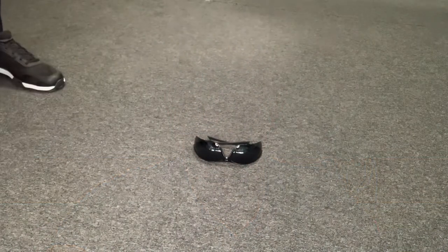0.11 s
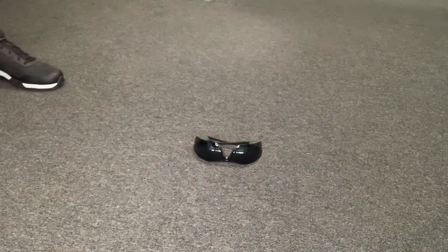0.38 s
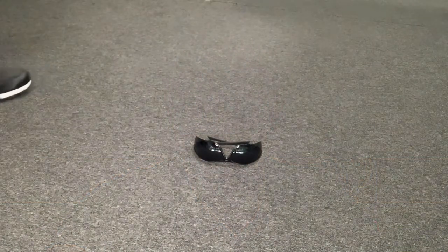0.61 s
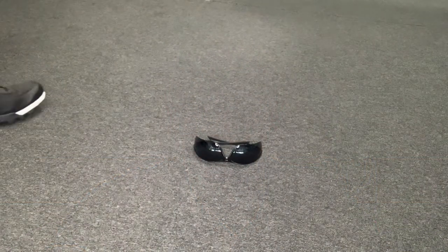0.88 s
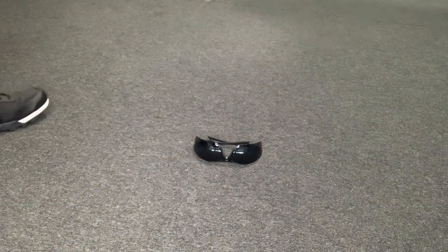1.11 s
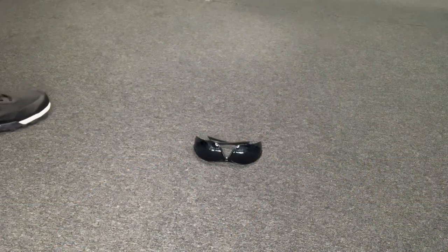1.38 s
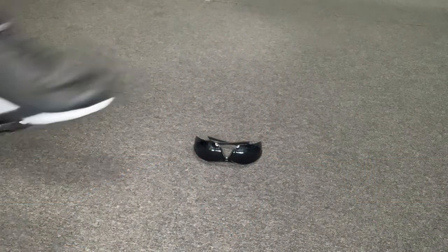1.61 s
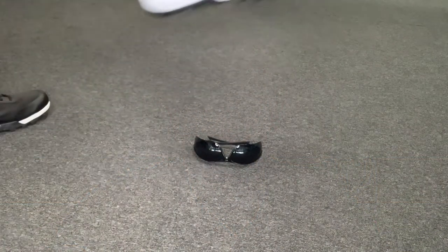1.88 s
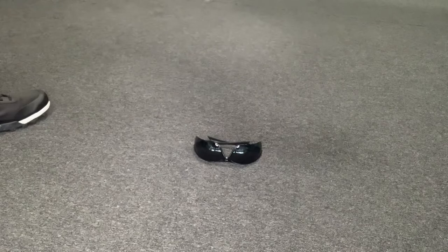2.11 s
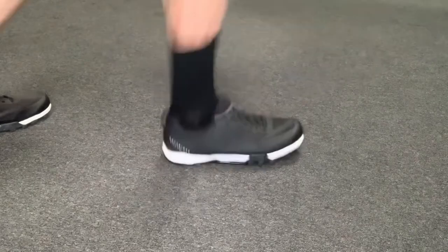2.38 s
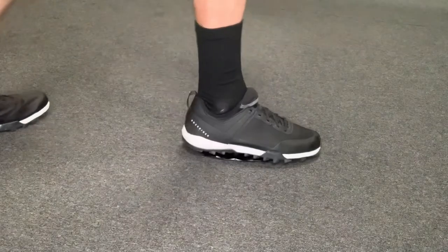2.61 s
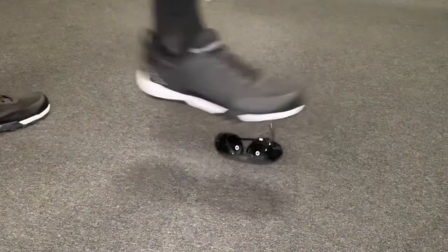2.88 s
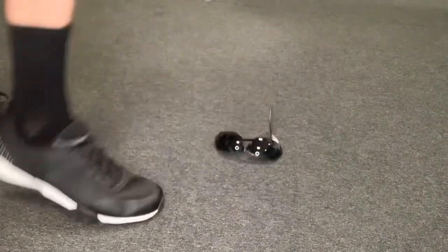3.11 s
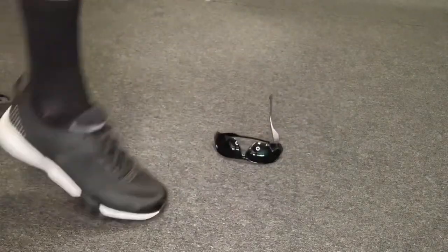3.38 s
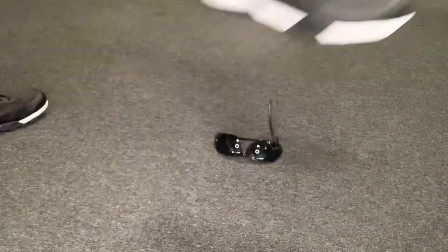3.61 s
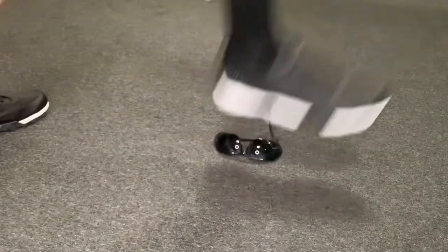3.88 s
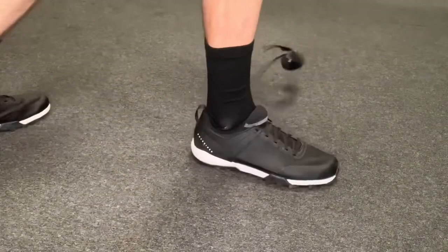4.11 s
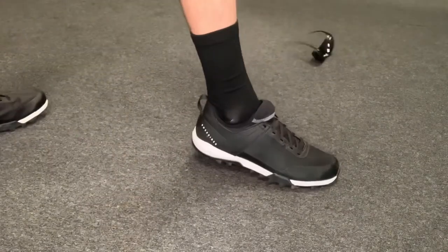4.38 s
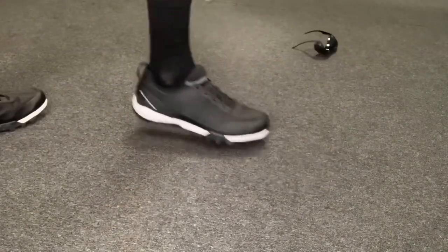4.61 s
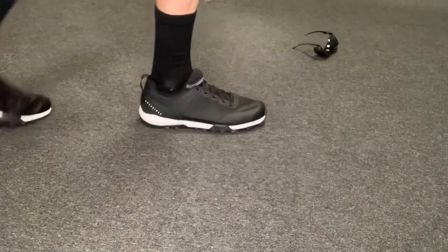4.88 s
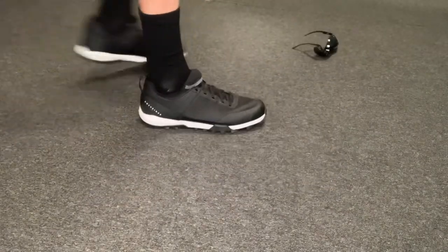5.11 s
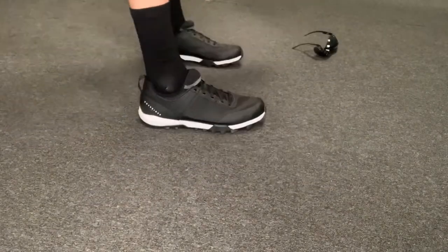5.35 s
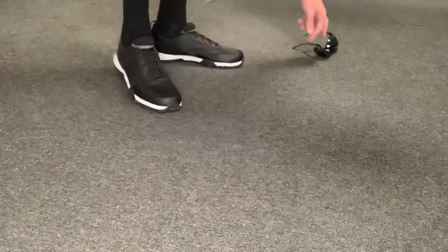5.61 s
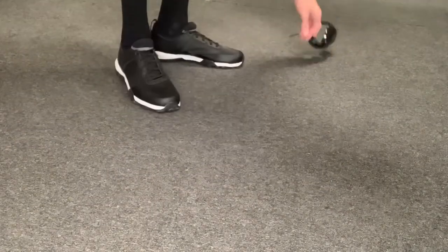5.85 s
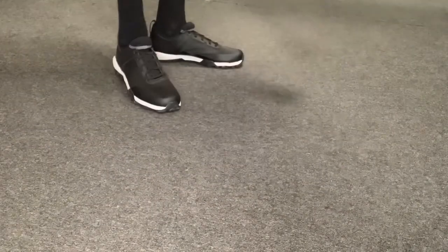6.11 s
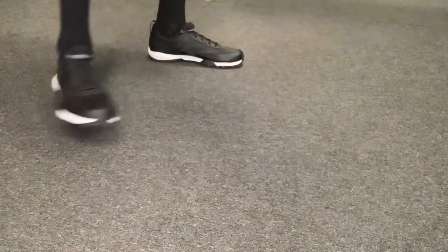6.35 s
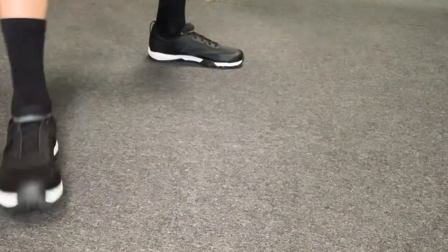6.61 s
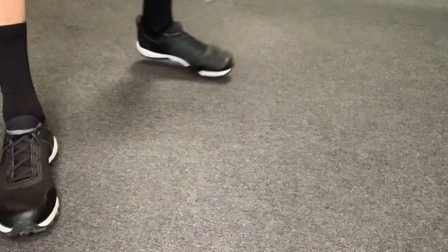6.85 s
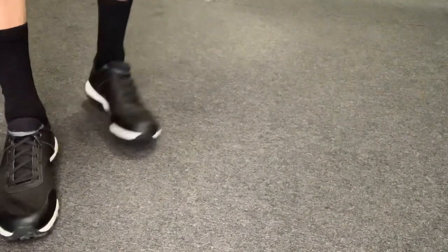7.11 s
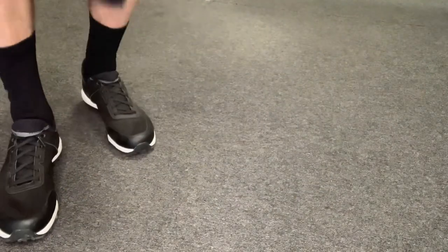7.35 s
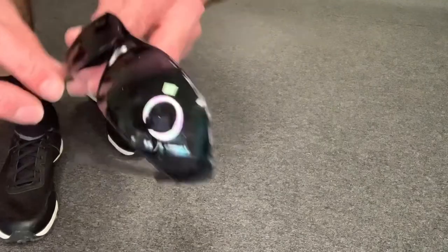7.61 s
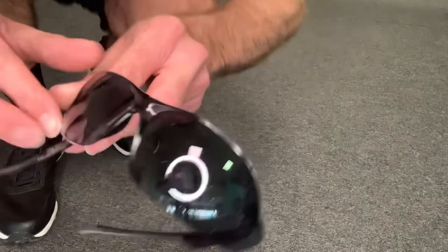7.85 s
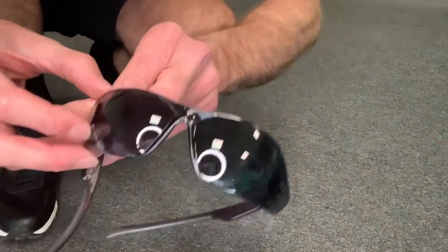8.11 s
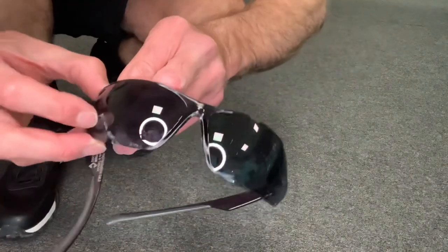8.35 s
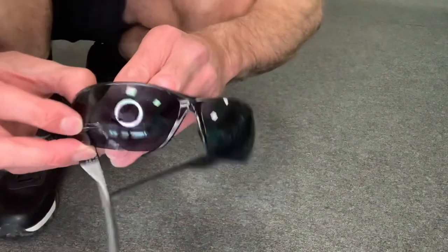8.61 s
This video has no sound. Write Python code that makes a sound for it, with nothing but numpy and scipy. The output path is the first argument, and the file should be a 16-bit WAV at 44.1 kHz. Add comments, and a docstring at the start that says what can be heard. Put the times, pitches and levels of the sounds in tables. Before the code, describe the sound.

Two violent close stamps crunch plastic glasses in a small humming room, surrounded by soft shoe shuffles, one rubber chirp and light handling clicks.

```python
"""A rubber sole stamps twice on plastic sunglasses on thin carpet, overloading a close microphone.
Noise bursts ring resonances of sole and plastic for slaps and cracks; pushes swing the floor's modes.
Around the stamps, flickering noise makes scuffs of sole and cloth, snaps make small plastic ticks, and
narrow noise makes creaks; one rubber squeak is a sagging tone. Random taps give the small room's echo,
over ventilation noise and a wavering mains hum."""
import sys
import numpy as np
from scipy import signal
from scipy.io import wavfile
from scipy.ndimage import uniform_filter1d

SR = 44100
rng = np.random.default_rng(int(sys.argv[2]) if len(sys.argv) > 2 else 0)


def dump(signal):
    """Clip the signal to [-1, 1] and save it as 16-bit WAV at the path in sys.argv[1]."""
    limited = np.clip(np.atleast_2d(signal).T, -1, 1)
    pcm = np.round(limited * 32767).astype(np.int16)
    wavfile.write(sys.argv[1], SR, pcm)


def convert_level_to_amplitude(level_db):
    """Map a level in decibels to its linear amplitude factor."""
    exponent = np.asarray(level_db, float) / 20
    return 10 ** exponent


N = 384993  # length in samples


def evened(x):
    """Scales to rms 1."""
    return x / np.sqrt(np.mean(x ** 2) + 1e-20)


def read(points, hz):
    """Reads a table along log frequency."""
    f, value = np.transpose(points)
    return np.interp(np.log(hz + 1), np.log(f + 1), value)


def add(mix, s, sound):
    """Mixes a sound in at a time in seconds."""
    part = mix[round(s * SR):][:len(sound)]
    part += sound[:len(part)]


def resonate(x, hz, width):
    """A one-pole resonance of gain 1."""
    r = np.exp(-np.pi * width / SR)
    return 2 * signal.lfilter([1 - r], [1, -r * np.exp(2j * np.pi * hz / SR)], x).real


def noise(field, size):
    """Random short-time spectra under a gain field of (seconds, Hz); a flat field of 1 gives rms 1."""
    hop = size // 4
    t = np.arange(N // hop + 5) * hop / SR
    hz = np.fft.rfftfreq(size, 1 / SR)
    a, b = rng.standard_normal((len(t), len(hz), 2)).T
    spectra = (a + 1j * b) * field(t, hz[:, None]) * np.sqrt(3 / size)
    return signal.istft(spectra, nperseg=size, noverlap=size - hop)[1][:N]


# Spectrum of the ventilation at the microphone: (frequency [Hz], relative level [dB per Hz])
AIR_SPECTRUM = [(4, -12), (12, 2.5), (30, -1.5), (45, -3), (72, -14.5), (110, -5), (170, -9.5),
                (277, -21.5), (455, -24), (600, -32.5), (1190, -39), (2500, -46.5), (12000, -62),
                (14700, -64), (16000, -78.5)]


def ventilation():
    """Steady air noise, mostly low rumble with a weak hiss above it."""
    rms_db = -46
    return convert_level_to_amplitude(rms_db) * evened(noise(lambda t, hz: convert_level_to_amplitude(read(AIR_SPECTRUM, hz)), size=4096))


# Mains hum: (frequency [Hz], width of fuzzy band [Hz], fuzzy level [dB], steady level [dB])
HUM_BANDS = [(50.7, 2.6, -53, -52.5), (102.5, 9.6, -52.5, -55.5), (152.2, 8.2, -56.5, -62),
             (198.3, 38, -61, -75.5)]


def mains_hum():
    """Steady tones inside fuzzy bands of noise, so the hum wavers."""
    out = np.zeros(N)
    t = np.arange(N) / SR
    for (hz, width, fuzzy_db, steady_db), w in zip(HUM_BANDS, rng.standard_normal((len(HUM_BANDS), N))):
        out += convert_level_to_amplitude(fuzzy_db) * evened(resonate(resonate(w, hz, width), hz, width))
        out += convert_level_to_amplitude(steady_db) * np.sqrt(2) * np.sin(2 * np.pi * hz * t + w[0])  # random phase
    return out


# Feet and trousers shuffling, before colouring: (time [s], level [dB])
SHUFFLE_LEVELS = [(0, -60), (.11, -71), (.28, -63.5), (.5, -65.5), (.63, -100), (.97, -74), (1.13, -65.5),
                  (1.45, -69.5), (1.75, -61.5), (1.97, -73.5), (2.22, -64.5), (2.6, -54), (2.7, -62.5),
                  (3.09, -67), (3.51, -59.5), (3.64, -66), (4.09, -57), (4.36, -68), (4.66, -68),
                  (4.76, -58.5), (4.95, -66.5), (5.12, -73.5), (5.39, -65), (5.55, -50), (5.75, -69),
                  (6.46, -74.5), (6.59, -61.5), (6.9, -64), (7.1, -75)]
# Hands and sleeves close to the microphone, before colouring: (time [s], level [dB])
HANDLING_LEVELS = [(6.58, -74.5), (6.73, -56.5), (7.05, -57), (7.32, -59.5), (7.96, -57.5), (8.04, -67.5),
                   (8.17, -60), (8.29, -57), (8.43, -61), (8.73, -70.5)]


def movement_db(t):
    """Levels of feet and of hands at the times t; silent outside their tables."""
    return [np.interp(t, *np.transpose(rows), -120, -120) for rows in (SHUFFLE_LEVELS, HANDLING_LEVELS)]


# Single rubbing strokes, before colouring:
# (start time [s], end time [s], level [dB], centre [Hz], slope above it [dB per octave])
RUB_STROKES = [(0.11, 0.158, -44, 2800, -5), (0.147, 0.202, -47, 2000, -5.5), (0.21, 0.46, -55, 2500, -6.5),
               (0.922, 1.015, -51.5, 1800, -9), (1.3, 1.366, -61.5, 3500, -5),
               (1.344, 1.384, -50, 1500, -4), (2.618, 2.719, -52, 3480, -6.5),
               (3.028, 3.135, -53, 2200, -5), (3.345, 3.367, -50.5, 2900, -7),
               (4.117, 4.15, -50.5, 3000, -9), (4.184, 4.26, -51.5, 3300, -15),
               (4.792, 4.883, -50, 1400, -7.5), (4.875, 4.92, -51.5, 1500, -5),
               (5.368, 5.438, -43.5, 1700, -10), (5.433, 5.48, -51.5, 2500, -5.5),
               (5.478, 5.59, -32, 2780, -16), (6.117, 6.197, -54.5, 2500, -7.5),
               (6.531, 6.616, -50, 1000, -1.5), (6.827, 6.924, -34, 910, -10.5),
               (6.97, 7.11, -44.5, 1014, -11), (7.178, 7.278, -46, 2000, -1.5), (7.68, 7.756, -53, 2980, 0),
               (8.155, 8.241, -37, 1500, -2)]
# Colour shared by all scuffing: (frequency [Hz], gain [dB])
SCUFF_GAINS = [(150, -57.5), (400, -0.5), (900, 2), (3000, 2.5), (8000, -1.5), (12000, -3), (15000, -14),
               (16000, -13.5)]


def scuffs():
    """Fibres catch and let go: flickering noise, brighter or duller with the stroke."""
    soft_db, soft_tilt_db, dulling = -74.5, -1.5, -0.24  # tilt per octave when soft, its change per dB
    handling_tilt_db = -3  # per octave
    stroke_lean = .75  # under 1: a stroke swells faster than it fades

    def field(t, hz):
        octaves = np.log2(np.maximum(hz, 800) / 3000)
        feet_db, hands_db = movement_db(t)
        tilt = soft_tilt_db + dulling * np.maximum(feet_db - soft_db, 0)  # harder shuffling is duller
        power = convert_level_to_amplitude(feet_db + tilt * octaves) ** 2
        power = power + convert_level_to_amplitude(hands_db + handling_tilt_db * octaves) ** 2
        for start, end, db, centre_hz, slope in RUB_STROKES:
            on = (t > start) & (t < end)
            off = np.log2((hz + 1) / centre_hz)
            shape_db = np.where(off > 0, slope * off, 0.64 * off)
            progress = (t[on] - start) / (end - start)
            swell = np.sin(np.pi * progress ** stroke_lean)
            power[:, on] += convert_level_to_amplitude(db + shape_db) ** 2 * swell ** 2
        # single fibres snap across all bands
        flicker_db = 0.9 * np.minimum(rng.exponential(1, len(t)), 6)
        patches = rng.standard_normal((len(t), len(hz))).T
        for axis in (0, 1):
            patches = uniform_filter1d(patches, size=8, axis=axis)
        flicker = evened(convert_level_to_amplitude(flicker_db + 2.7 * evened(patches)))
        return np.sqrt(power) * convert_level_to_amplitude(read(SCUFF_GAINS, hz)) * flicker
    return noise(field, size=256)


# Weight coming on the floor: (time [s], level [dB], contact [s])
FOOT_LANDINGS = [(.15, -38, .0088), (1.363, -27.5, 0.032), (1.43, -21.5, 0.078), (2.345, -14, 0.0096),
                 (3.04, -25, 0.0087), (3.9, -12, .008), (6.538, -27, .0026), (6.565, -16.5, 0.032),
                 (6.685, -23.5, 0.023), (8.23, -27, 0.028)]
# Weight lifting off the floor: (time [s], level [dB], contact [s])
FOOT_LIFTS = [(.12, -34.5, 0.0032), (3.13, -22.5, 0.043), (3.3, -24, .05), (8.17, -13, 0.09)]
# Low modes of the floor: (frequency [Hz], relative level [dB], decay by 60 dB [s])
FLOOR_RESONANCES = [(14.037, -2, 0.78), (20, 0, 0.51), (32.7, -4.5, 0.98), (45, -6, 0.38), (62, -4.5, .43),
                    (130, -13.5, .6), (182, -16.5, 0.53)]


def footfalls():
    """A half-sine push, softer for longer contact, sets the floor's low modes swinging."""
    force, t = np.zeros(N), np.arange(SR // 2) / SR
    for rows, direction in ((FOOT_LANDINGS, 1), (FOOT_LIFTS, -1)):
        for s, db, contact in rows:
            push = np.sin(np.pi * np.arange(0, contact, 1 / SR) / contact)
            add(force, s, direction * convert_level_to_amplitude(db) * push / np.sqrt(contact * SR * push.sum()))
    floor = sum(convert_level_to_amplitude(db - 60 * t / t60) * np.cos(2 * np.pi * hz * t) for hz, db, t60 in FLOOR_RESONANCES)
    return signal.oaconvolve(force, floor)[:N]


# The sole slaps the floor; the whole sole sounds deep, heel or toe alone higher:
# (time [s], length [s], level [dB], lowest resonance [Hz])
SOLE_SLAPS = [(0.1207, 0.011, -46, 680), (0.151, 0.0025, -42.5, 910), (1.1552, 0.0033, -41, 590),
              (1.365, .008, -54, 895), (2.338, .007, -6, 427), (3.039, .004, -34, 600),
              (3.897, 0.0031, -15.5, 780), (3.9027, 0.0024, -4.5, 370.5), (3.9358, 0.0019, -15, 487),
              (4.199, 0.0046, -39, 526), (6.551, 0.0088, -50, 597)]
# Broad resonances of the sole: (pitch [x lowest], width [x lowest], gain [dB])
SOLE_RESONANCES = [(1, 0.76, 1.2), (2.2, 1.3, -8)]


def sole_slaps():
    """Lists each slap through each resonance: (time, level, length, pitch, width, walls dB)."""
    walls_db = 0.1  # sent towards the walls, against the direct sound
    return [(s, db + part_db, length, hz * pitch, hz * width, walls_db)
            for s, length, db, hz in SOLE_SLAPS for pitch, width, part_db in SOLE_RESONANCES]


# The glasses crack under the sole:
# (time [s], length [s], level [dB], boost of the upper resonances [dB])
PLASTIC_CRACKS = [(2.3363, 0.0078, 1.5, 4), (2.3489, .0015, -6, 9), (3.898, .004, -23, 11.5),
                  (3.9023, 0.00302, -17, 11.5), (3.94, 0.0013, -28, 16), (3.9479, .0015, -36.5, 18.5),
                  (3.951, 0.0033, -37.5, 18.5)]
# Resonances of frame and lenses: (frequency [Hz], width [Hz], gain [dB])
PLASTIC_RESONANCES = [(1155, 420, -0.65), (2600, 790, -13), (4300, 1800, -20)]


def plastic_cracks():
    """Lists each crack through each resonance: (time, level, length, pitch, width, walls dB)."""
    walls_db = -0.5  # sent towards the walls, against the direct sound
    lowest_hz = PLASTIC_RESONANCES[0][0]
    return [(s, db + part_db + bright_db * (hz > lowest_hz), length, hz, width, walls_db)
            for s, length, db, bright_db in PLASTIC_CRACKS for hz, width, part_db in PLASTIC_RESONANCES]


def blows():
    """Bursts of tiny fractures through broad resonances: row 0 is heard directly, the rest go to the walls."""
    out = np.zeros((6, N))
    low_cut = signal.butter(2, 220, "highpass", fs=SR)  # a small object radiates little bass
    t = np.arange(2048) / SR
    click = 1. * (t == 0)  # summed over all directions the burst has a smoother, wider spectrum
    parts = sole_slaps() + plastic_cracks()
    fractures = rng.standard_normal((len(parts), len(t)))
    for k, ((s, db, length, hz, width, walls_db), z) in enumerate(zip(parts, fractures)):
        burst = z * np.minimum(t / 0.00017, 1) * np.exp(-(t / length) ** 4)
        to_walls = out[1 + k % (len(out) - 1)]
        for mix, drive, wide, level_db in ((out[0], burst, width, db),
                                           (to_walls, click, 1.6 * width, db + walls_db)):
            ring = resonate(signal.lfilter(*low_cut, drive), hz, wide)
            ring = resonate(ring, hz, 2.8 * wide)
            ring = resonate(ring, hz, 4 * width)
            add(mix, s, convert_level_to_amplitude(level_db) * ring / np.sqrt(np.sum(ring ** 2) / (length * SR)))
    return out


# The clearest ticks of plastic and grit: (time [s], peak level [dB], pitch [Hz])
CLEAR_TICKS = [(.2733, -43, 2230), (0.5418, -43.5, 2550), (1.1552, -22, 3080), (1.3266, -51, 3370),
               (2.6314, -39, 4400), (3.0924, -41, 2200), (3.308, -42, 2540), (3.5758, -44.5, 2220),
               (3.6094, -44.5, 2200), (4.0735, -47.5, 2990), (4.109, -43, 2800), (4.124, -45, 3130),
               (4.1605, -43, 2470), (4.2608, -45, 2890), (4.3077, -44.5, 2360), (4.4408, -45.5, 2315),
               (4.5194, -47, 2240), (4.8944, -46, 2730), (5.6825, -42, 3286), (5.9232, -48.5, 3230),
               (6.1409, -40.5, 2490), (6.784, -43, 2356), (7.1364, -43.5, 2710), (7.4851, -36, 3590),
               (7.5345, -43, 3780), (7.5877, -38, 3690), (7.6572, -37, 2720), (7.6913, -33.5, 3000),
               (7.715, -36, 4280), (7.7294, -41, 2700), (8.3736, -43, 2204), (8.6221, -34, 3300)]
# Bright splinters breaking off in the first stamp and just after it:
# (time [s], peak level [dB], pitch [Hz])
BRIGHT_SPLINTERS = [(2.337, -9, 6100), (2.371, -31, 9000), (2.384, -33, 9000), (2.406, -35, 8500),
                    (2.413, -35, 8500)]


def ticks():
    """Short snaps: a sharp edge, a little grit and a few cycles of ring; faint ones come with movement."""
    damping = .6  # width as a share of pitch
    faint_count, faint_db, faint_spread_db = 26, -54, 6
    low_hz, high_hz = 2200, 3500  # pitches of the faint ticks
    out, t = np.zeros(N), np.arange(600) / SR
    clock = np.arange(0, N / SR, .01)
    busy = np.cumsum(sum(convert_level_to_amplitude(db) for db in movement_db(clock)))
    # more movement draws more faint ticks
    faint = [(np.interp(a * busy[-1], busy, clock), faint_db + faint_spread_db * b,
              low_hz + (high_hz - low_hz) * c)
             for a, b, c in rng.random((faint_count, 3))]
    rows = CLEAR_TICKS + BRIGHT_SPLINTERS + faint
    for (s, db, hz), z in zip(rows, rng.standard_normal((len(rows), len(t)))):
        snap = (t == 0) + .2 * z * np.exp(-t / .0006)  # edge and grit
        for width in (damping * hz, 1.6 * hz, 3.2 * hz):
            snap = resonate(snap, hz, width)
        add(out, s, convert_level_to_amplitude(db) * snap / abs(snap).max())
    return out


# Bent plastic easing back: (time [s], length [s], level [dB], pitch [Hz])
PLASTIC_CREAKS = [(2.676, 0.019, -61.5, 3330), (2.706, .008, -58.5, 2660), (3.341, .022, -60, 3010)]


def creaks():
    """Brief noise in one narrow resonance."""
    out = np.zeros(N)
    for (s, length, db, hz), z in zip(PLASTIC_CREAKS, rng.standard_normal((len(PLASTIC_CREAKS), SR // 20))):
        swell = np.sin(np.pi * np.minimum(np.arange(len(z)) / SR / length, 1))
        width = 0.052 * hz
        ring = evened(resonate(resonate(z, hz, width), hz, width))
        add(out, s, convert_level_to_amplitude(db) * np.sqrt(2) * swell * ring)
    return out


# The one squeak: (start time [s], peak time [s], end time [s], slip rate up to the peak [Hz])
SQUEAK_COURSE = (5.49, 5.516, 5.578, 710)
# Hollow of the sole, stirred by the slips: (frequency [Hz], width [Hz], level against the slips [dB])
SOLE_HOLLOW = (706, 100, -6.5)


def squeak():
    """Stick-slip of rubber whose rate sags while it fades, ringing the hollow of the sole."""
    peak_db, octave_db = -23, -13.5  # level at the peak; second harmonic against the first
    swell_db_per_s, fade_db_per_s, sag_hz_per_s = 1600.5, 560.5, 7500
    ring_fade_share = 0.557  # the hollow fades more slowly than the slips
    start, peak, end, top_hz = SQUEAK_COURSE
    t = np.arange(start, end, 1 / SR) - peak
    db = peak_db + np.where(t < 0, swell_db_per_s, -fade_db_per_s) * t
    hz = top_hz - sag_hz_per_s * np.maximum(t, 0)
    hz = hz * (1 + 0.4 * uniform_filter1d(rng.standard_normal(len(t)), 60))  # uneven slips
    turn = 2 * np.pi * np.cumsum(hz) / SR
    slips = np.sqrt(2) * convert_level_to_amplitude(db) * (np.sin(turn) + convert_level_to_amplitude(octave_db) * np.sin(2 * turn))
    chatter_db = np.where(t < 0, db, peak_db - ring_fade_share * fade_db_per_s * t)
    chatter = convert_level_to_amplitude(chatter_db) * rng.standard_normal(len(t))
    ring_hz, width, ring_db = SOLE_HOLLOW
    ring = convert_level_to_amplitude(ring_db) * resonate(chatter, ring_hz, width) * np.sqrt(SR / (2 * np.pi * width))
    out = np.zeros(N)
    add(out, start, slips + ring)
    return out


# How long the small room rings: (frequency [Hz], decay by 60 dB [s])
ROOM_DECAYS = [(60, 0.36), (150, .6), (300, 0.5), (600, 0.6), (1200, .45), (2500, .42), (5000, 0.32),
               (11000, 0.2)]
# Colour of the echo: (frequency [Hz], relative level [dB])
ECHO_COLOUR = [(100, 8), (400, -0.5), (1200, -4.5), (2000, -7), (3000, -5.5), (6000, -5), (10000, 0),
               (16000, -1.42)]


def room(x):
    """Sparse taps whose bands die at their own speed; each row of x takes its own path."""
    echo_db = -9
    taps = np.zeros((len(x), SR))
    at = np.arange(300, SR - 20, 20) + rng.integers(0, 20, (len(x), (SR - 301) // 20))
    np.put_along_axis(taps, at, rng.choice([-1., 1.], at.shape), 1)
    hz, t, z = signal.stft(taps, SR, nperseg=512)
    fade_db = read(ECHO_COLOUR, hz)[:, None] - 60 * t / read(ROOM_DECAYS, hz)[:, None]
    tail = signal.istft(z * convert_level_to_amplitude(fade_db), SR, nperseg=512)[1]
    tail = convert_level_to_amplitude(echo_db) * tail / np.linalg.norm(tail[0])
    return signal.fftconvolve(x, tail, axes=1)[:, :N].sum(0)


def scene():
    """Everything struck or rubbed sounds in the room; floor shake and background arrive directly."""
    direct, *to_walls = blows()
    small = ticks() + creaks()
    rubbed = squeak() + scuffs()
    echo = room(np.array([convert_level_to_amplitude(-3.5) * small + convert_level_to_amplitude(-4.5) * rubbed, *to_walls]))
    background = ventilation() + mains_hum()
    return (direct + small + rubbed + echo + footfalls() + background)[None]


def top_cut(x):
    """Nothing passes above the cut-off."""
    return signal.sosfilt(signal.butter(12, 16750, fs=SR, output="sos"), x)


def record(dry):
    """The close microphone's input overloads: peaks beyond its limit are cut flat."""
    mix = np.clip(dry, -.97, .97)
    return top_cut(mix)


dry = scene()
out = record(dry)
dump(out)
```